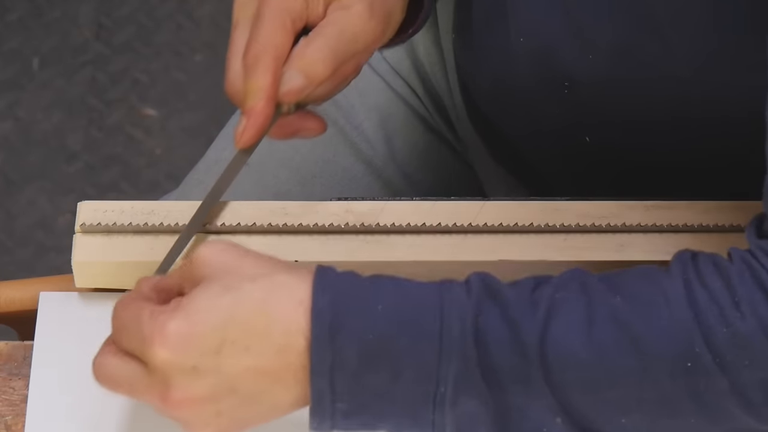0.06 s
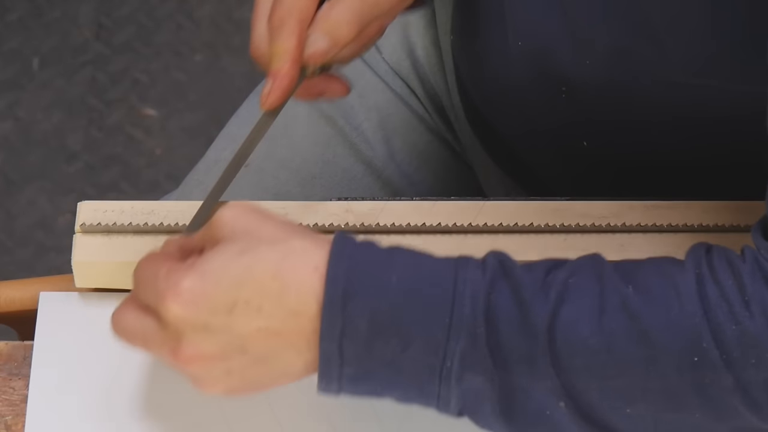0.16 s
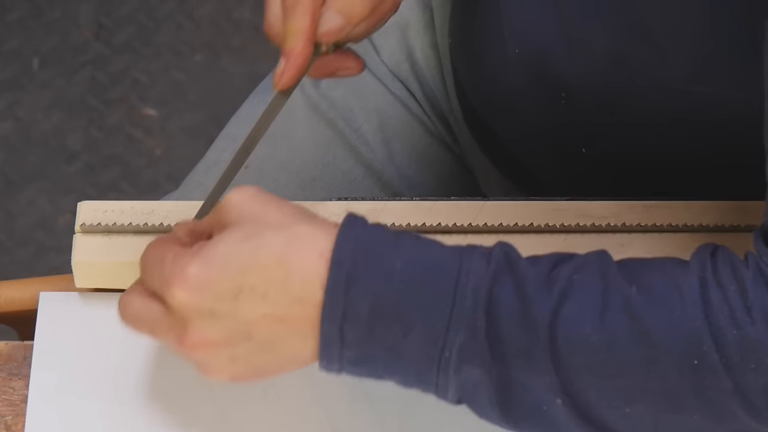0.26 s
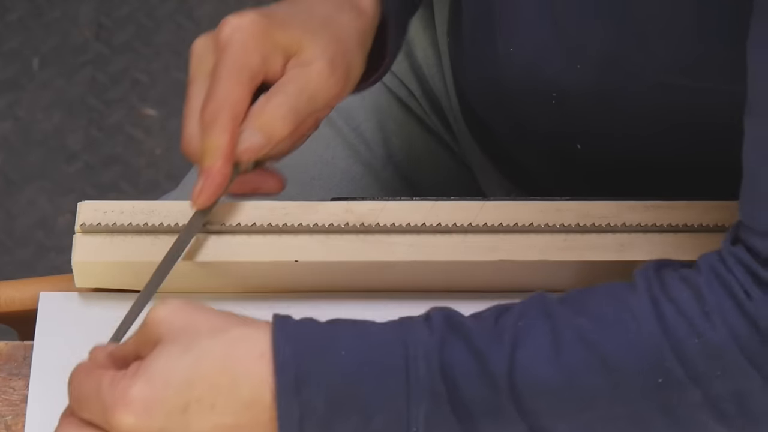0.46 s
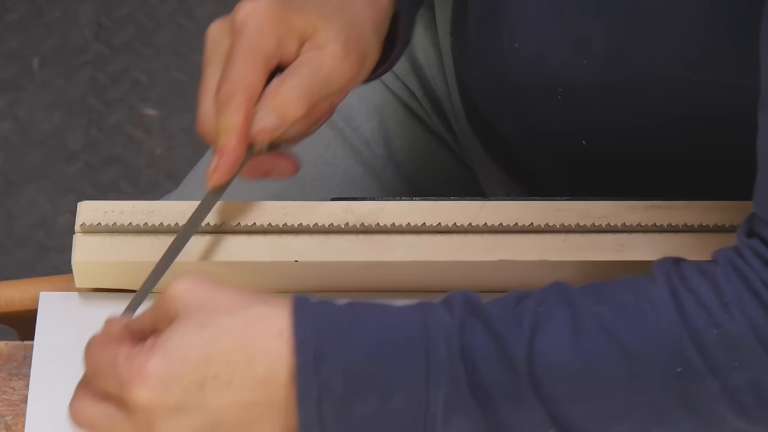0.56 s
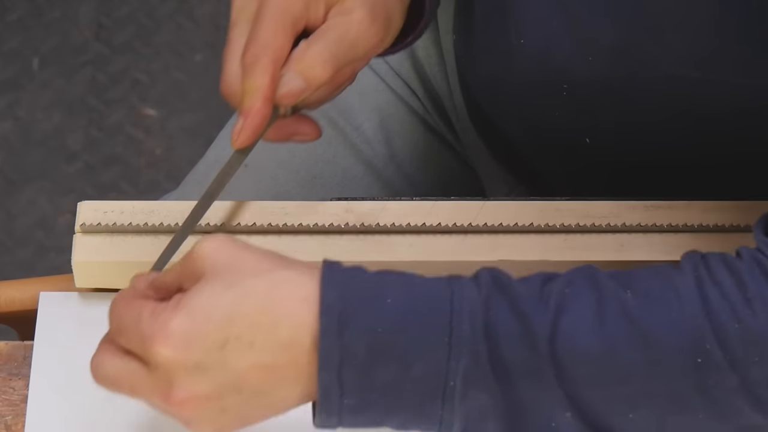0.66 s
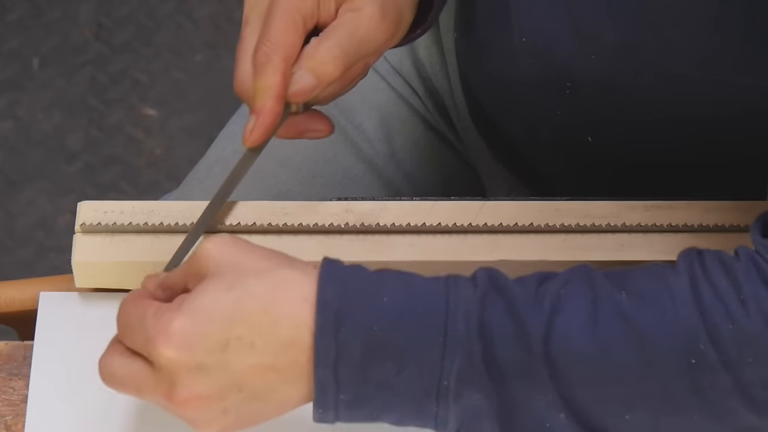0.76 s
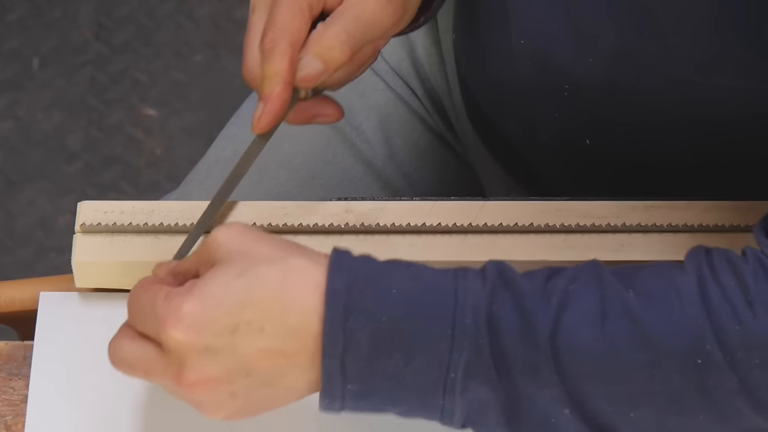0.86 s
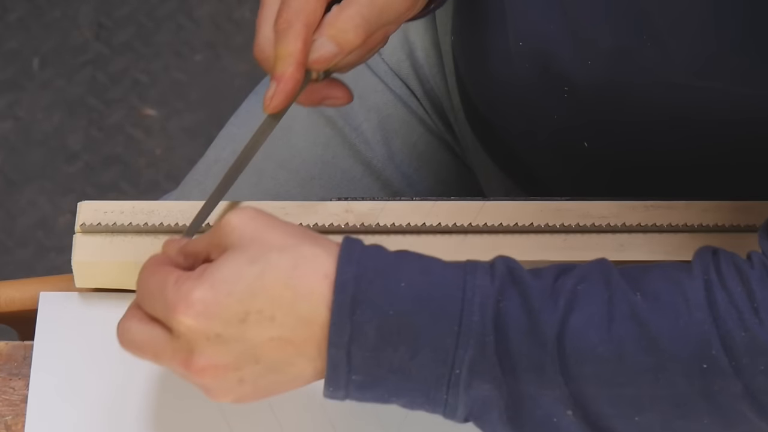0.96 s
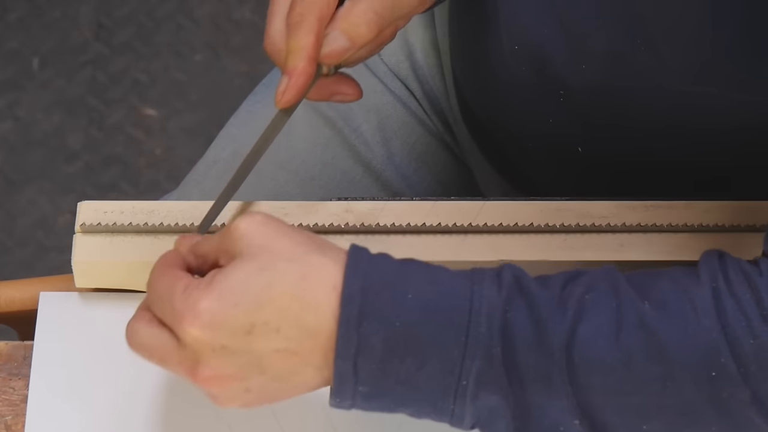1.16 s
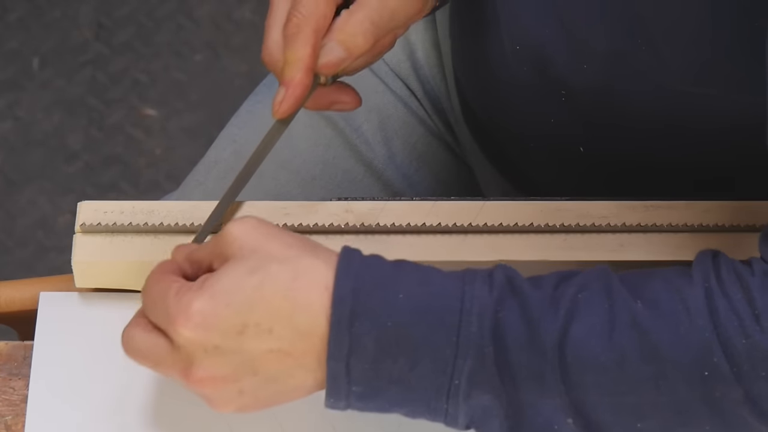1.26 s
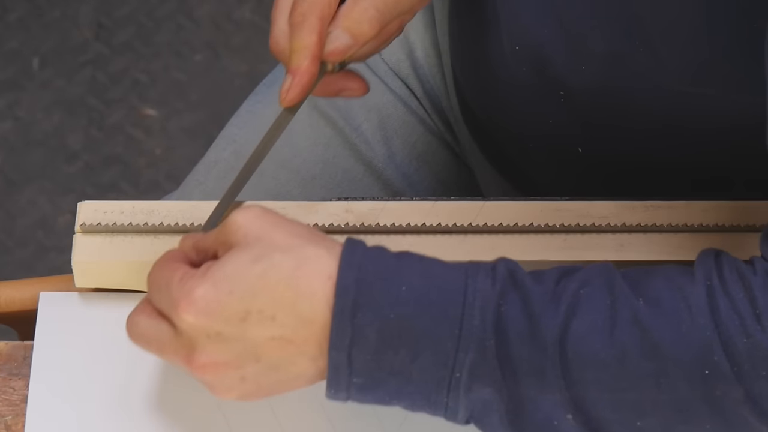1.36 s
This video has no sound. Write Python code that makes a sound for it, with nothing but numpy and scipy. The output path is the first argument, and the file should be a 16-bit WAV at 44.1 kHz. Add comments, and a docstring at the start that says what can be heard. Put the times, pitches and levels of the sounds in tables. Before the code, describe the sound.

Hand filing of a handsaw: light scratchy draw back, loud short rasping cut, then quieter draw

```python
"""Sharpening a saw by hand

A hand file sharpens a saw clamped in a wooden vice, close by in a small workshop.
It is drawn lightly back, pushed hard through the tooth with a short squeal, drawn back and set down once more.
Each ridge of the file pushes the tooth: slow ridges tick singly, fast ones blur into a rasp.
Blade and vice ring with these pushes, torn grit hisses on top, and noise and gliding tones make the rest.
"""
import sys
import numpy as np
from scipy import signal
from scipy.fft import rfft, irfft, next_fast_len
from scipy.io import wavfile
from scipy.ndimage import map_coordinates

SR = 44100
rng = np.random.default_rng(int(sys.argv[2]) if len(sys.argv) > 2 else 0)


def generate_wav(sig):
    """Save sig (samples, or channels by samples) to the path in sys.argv[1] as 16-bit PCM at SR."""
    pcm = np.round(np.clip(np.atleast_2d(sig).T, -1, 1) * 32767).astype(np.int16)
    wavfile.write(sys.argv[1], SR, pcm)


N = 61739  # length in samples


def amp(db):
    """Turn decibels into a gain."""
    return 10 ** (np.asarray(db) / 20)


def unit(x):
    """Scale a sound to an average (rms) strength of 1."""
    return x / np.sqrt(np.mean(x ** 2) + 1e-20)


def clock():
    """Give the time of each sample in seconds."""
    return np.arange(N) / SR


def along(points, hz):
    """Read a curve of (f/Hz, value) points, spaced by pitch as the ear hears it."""
    f, value = np.transpose(points)
    return np.interp(np.log(hz + 1), np.log(f + 1), value)


def wobble(rate):
    """Make a smooth random curve with this many random points a second."""
    return map_coordinates(rng.standard_normal(N // 8), [clock() * rate], mode="wrap")


def convolve(x, response):
    """Let every sample of x set off the given response."""
    return signal.fftconvolve(x, response)[:N]


def colour(points, size=8192):
    """Make a filter of energy 1 with the given spectrum, which never sounds before it is struck."""
    db = np.maximum(along(points, np.fft.rfftfreq(size, 1 / SR)), -100)
    # folding the cepstrum forward in time gives the minimum-phase filter
    cepstrum = irfft(np.log(amp(db)))
    cepstrum[1:size // 2] *= 2
    cepstrum[size // 2 + 1:] = 0
    h = irfft(np.exp(rfft(cepstrum)))
    return h / np.linalg.norm(h)


def dying_noise(shape, t60s):
    """Make a burst of noise of energy 1 in which each frequency dies at its own speed."""
    hz, t, z = signal.stft(rng.standard_normal(SR * 3 // 4), SR, nperseg=256)
    start_db = along(shape, hz)[:, None]
    t60 = along(t60s, hz)[:, None]
    tail = signal.istft(z * amp(start_db - 60 * t / t60), SR, nperseg=256)[1]
    return tail / np.linalg.norm(tail)


EDGE_DB_PER_S = 2483  # how fast contact is made and lost


def stroke_gain(strokes, axis):
    """Follow one level column through the strokes, falling away quickly outside each."""
    t, gain = clock(), np.zeros(N)
    for rows in strokes:
        s, db = np.transpose(rows)[[0, axis]]
        outside = abs(t - np.clip(t, s[0], s[-1]))
        gain += amp(np.interp(t, s, db) - EDGE_DB_PER_S * outside)
    return gain


# colour of the still air: f/Hz, relative level/dB
AIR_COLOUR = [(25, -19.5), (60, -7.5), (130, -6.5), (220, -3.5), (450, -8.5), (1000, -16.5), (4000, -25),
              (5400, -33), (8000, -25.5), (15000, -37.5)]
# colour of the wooden vice, also heard in the rasp: f/Hz, relative level/dB
VICE_COLOUR = [(20, -57), (60, -23), (190, -19.5), (222, -6), (290, -5), (370, 1), (500, 0.5), (620, 1),
               (760, -6), (1000, -18.5), (2500, -61.5)]
# colour of the lightly stroked blade, also heard in the rasp: f/Hz, relative level/dB
BLADE_LIGHT_COLOUR = [(300, -43.5), (700, -9), (900, -6.5), (1120, 5.5), (1400, -2.5), (2000, -5),
                      (2500, -13.5), (3200, -16.5), (4700, -23), (5500, -47)]
AIR_DB = -65
HUM_DB, HUM_HZ = -69, 150.5
LINGER_DB, LINGER_DB_PER_S = -52, 93.5  # start level and fall of the earlier stroke's echo


def background():
    """Coloured noise for still air, a sine for a faint hum, fading noise for an earlier stroke's echo."""
    t = clock()
    air = amp(AIR_DB) * unit(convolve(rng.standard_normal(N), colour(AIR_COLOUR)))
    saw_colour = colour(VICE_COLOUR) + colour(BLADE_LIGHT_COLOUR) / 2
    echo = unit(convolve(rng.standard_normal(N), saw_colour))
    linger = amp(LINGER_DB - LINGER_DB_PER_S * t) * echo
    hum = amp(HUM_DB) * unit(np.sin(2 * np.pi * HUM_HZ * t))
    return air + linger + hum


# single ridges catch on the tooth: t/s, click relative level/dB, knock relative level/dB
CATCHES = [(0.071, -34, -24), (0.0759, -31, -24), (0.0854, -30.5, -22), (0.0917, -28, -27.5),
           (0.106, -32, -38), (0.2704, -52, -39), (0.2804, -32, -38), (0.2881, -33, -31),
           (0.7978, -39.5, -29), (0.8026, -34, -27.5), (0.8142, -33, -32), (0.818, -25.5, -28.5),
           (0.8284, -27, -32), (0.8339, -28.5, -40.5), (0.8406, -21.5, -26), (1.294, -39, -29),
           (1.3361, -38, -27.5), (1.3475, -36, -29.5), (1.3619, -38, -27.5), (1.3719, -33, -28.5),
           (1.3795, -52, -37), (1.3851, -36, -29.5), (1.3954, -41, -29)]
# colour of the knock: f/Hz, relative level/dB
KNOCK_COLOUR = [(25, -33.5), (60, -18), (190, -13.5), (260, -5), (540, 3), (800, -6.5), (1250, 1.5),
                (1600, -7.5), (2100, -8), (2700, -14), (4500, -24), (5500, -40)]
# how the knock dies: f/Hz, time to fall 60 dB t60/s
KNOCK_DIES = [(150, 0.39), (450, 0.23), (800, 0.023), (1300, 0.18), (2200, 0.019), (5000, 0.023)]
# colour of grit torn off the tooth, for clicks and rasp: f/Hz, relative level/dB
GRIT_COLOUR = [(1500, -22), (2800, -1), (4400, -4.5), (5350, -9.5), (6500, -1.5), (7800, 1.5), (10300, 0),
               (12500, -9), (15500, -21)]
CLICK_DB, KNOCK_DB, CHIRP_DB = -8, 23.5, .5  # added to the levels of each catch
CLICK_T60, CHIRP_T60 = 0.013, 0.019  # seconds to fall 60 dB
CHIRP_HZ, CHIRP_END_HZ = 2320, 1089  # typical start and end; each catch varies a little
CHIRP_FALL_S, CHIRP_ATTACK_S = 0.0072, .0006


def catches():
    """A ridge snaps off the tooth: a bright click, a falling chirp in the blade and a knock in the vice."""
    t = np.arange(SR // 10) / SR
    clicks, knocks = np.zeros((2, N + SR))
    for s, click_db, knock_db in CATCHES:
        at = round(s * SR)
        glide = CHIRP_END_HZ + (CHIRP_HZ - CHIRP_END_HZ) * np.exp(-t / CHIRP_FALL_S)
        hz = glide * rng.normal(1, 0.034)
        envelope = amp(CHIRP_DB - 60 * t / CHIRP_T60) * (1 - np.exp(-t / CHIRP_ATTACK_S))
        chirp = envelope * np.sin(2 * np.pi * np.cumsum(hz) / SR)
        knock = amp(KNOCK_DB) * dying_noise(KNOCK_COLOUR, KNOCK_DIES)
        knock[:len(t)] += chirp
        knocks[at:at + len(knock)] += amp(knock_db) * knock
        click_gain = amp(click_db + CLICK_DB - 60 * t / CLICK_T60)
        clicks[at:at + len(t)] += click_gain * rng.standard_normal(len(t))
    return convolve(clicks, colour(GRIT_COLOUR)) + knocks[:N]


# speed of the file: t/s, ridges per second
SPEED = [(.07, 155), (.12, 360), (.18, 536), (0.246, 645), (.27, 580), (0.296, 470), (.32, 404), (.34, 600),
         (.355, 650), (.385, 1340), (.42, 1560), (.475, 2100), (.535, 1650), (.81, 170), (.85, 230),
         (.89, 399), (.91, 537), (0.951, 310), (.985, 549), (1.0, 507), (1.375, 170), (1.4, 260)]


def ridge_rate():
    """Count the ridges passing the tooth each second: a faster file passes more."""
    return np.interp(clock(), *np.transpose(SPEED))


JITTER = .13  # typical timing error, as a share of the time between ridges
SCATTER_DB = 2.5  # typical difference in strength between ridges
GRIT_DECAY = 1.5  # each puff of grit fades by exp(-1.5) before the next


def ridges():
    """Each ridge gives the tooth one uneven push, and a puff of grit that fades towards the next."""
    rate = ridge_rate()
    turns = np.cumsum(rate) / SR  # ridges passed so far
    count = np.arange(int(turns[-1]))
    chance = rng.standard_normal((len(count), 2))
    at = np.clip(np.searchsorted(turns, count + JITTER * chance[:, 0]), 0, N - 1)
    sizes = amp(SCATTER_DB * chance[:, 1])
    pushes = np.bincount(at, sizes, N) / np.sqrt(rate)
    steady = sizes.mean() * np.sqrt(rate) / SR  # the constant part of the push, removed below
    size_now = sizes[np.minimum(turns.astype(int), len(count) - 1)]
    gate = np.exp(-GRIT_DECAY * (turns % 1)) * size_now
    return unit(pushes - steady), unit(gate)


# ringing modes of blade and vice: f/Hz, relative level/dB, time to fall 60 dB t60/s
SAW_MODES = [(239.7, -12.5, 0.2), (245.2, -10.5, .12), (323, -7, 0.18), (375, -3.5, 0.053),
             (490.4, -1, .09), (584, -3, .09), (1089, 1, .13), (1164, 4, .08), (1297, -7, .05),
             (1566, 5, 0.22), (1940, -2.5, 0.087), (2250, -8, .05)]
RING_DB = -55  # ringing against the push itself, before each mode's own level


def saw_response(points):
    """A push on the tooth gives a broad answer and sets off the fading modes of blade and vice."""
    t = np.arange(SR // 3) / SR
    ring = np.zeros(len(t))
    for hz, db, t60 in SAW_MODES:
        ring += amp(RING_DB + db - 60 * t / t60) * np.cos(2 * np.pi * hz * t)
    ring[0] += 1  # the push itself
    h = signal.fftconvolve(ring, colour(points))
    return h / np.linalg.norm(h)


# light strokes, one list each: t/s, relative level/dB of the vice, of the blade, of the treble grit
DRAWS = [
    [(0.078, -34.5, -33.5, -42), (0.088, -26, -23.5, -51), (0.128, -28, -34, -49.5),
     (0.17, -29, -27.5, -46), (0.182, -25, -19, -45.5), (0.2, -29, -23, -40), (0.27, -22.5, -19.5, -37.5),
     (0.29, -25.5, -37, -58)],
    [(0.815, -38.5, -37, -43), (0.827, -30.5, -23.5, -52.5), (0.841, -42.5, -31.5, -45),
     (0.857, -37.5, -31, -50.5), (0.881, -26.5, -33.5, -47), (0.907, -27.5, -28, -55),
     (0.961, -33.5, -41, -58), (0.983, -29, -31.5, -44.5), (0.995, -23, -39, -64)],
    [(1.376, -42.5, -31, -59), (1.39, -24.5, -33, -57), (1.4, -48, -34.5, -35)],
]
# the cutting stroke: t/s, relative level/dB of the vice, of the blade, of the treble grit
CUT = [
    [(0.32, -26, -37, -47.5), (0.35, -17, -23.5, -34.5), (0.388, -21.5, -17.5, -18),
     (0.412, -15, -9.5, -9.5), (0.426, -20.5, -18, -34.5), (0.44, -19, -20.5, -23),
     (0.464, -22.5, -17, -10.5), (0.535, -23, -27, -38)],
]
# colour of the hard-pressed blade: f/Hz, relative level/dB
BLADE_HARD_COLOUR = [(300, -32.5), (700, -11.5), (900, -2), (1090, 5.5), (1400, -6), (1850, 1.5),
                     (2350, -9), (2900, -8), (3400, -24.5), (4700, -14.5), (5500, -40.5)]
# added to the stroke levels
DRAW_VICE_DB, DRAW_BLADE_DB, DRAW_GRIT_DB = -2, -2, -2.5
CUT_VICE_DB, CUT_BLADE_DB, CUT_GRIT_DB = 0.5, 2, -3.5
ROUGH = 0.29  # share of noise in the light strokes


def rasp():
    """The ridges drive vice and blade and tear off grit, lightly on the draws and hard on the cut."""
    noise = rng.standard_normal((2, N))
    pushes, gate = ridges()
    scrape = gate * noise[0]
    stroking = np.sqrt(1 - ROUGH) * pushes + np.sqrt(ROUGH) * scrape
    cutting = unit(pushes / 2 + scrape)

    vice = amp(DRAW_VICE_DB) * stroke_gain(DRAWS, axis=1) * stroking
    vice += amp(CUT_VICE_DB) * stroke_gain(CUT, axis=1) * cutting
    light = amp(DRAW_BLADE_DB) * stroke_gain(DRAWS, axis=2) * stroking
    hard = amp(CUT_BLADE_DB) * stroke_gain(CUT, axis=2) * cutting
    grit_gain = amp(DRAW_GRIT_DB) * stroke_gain(DRAWS, axis=3)
    grit_gain += amp(CUT_GRIT_DB) * stroke_gain(CUT, axis=3)
    grit = gate * noise[1] * grit_gain

    body = convolve(vice, saw_response(VICE_COLOUR))
    body += convolve(light, saw_response(BLADE_LIGHT_COLOUR))
    body += convolve(hard, saw_response(BLADE_HARD_COLOUR))
    return body + convolve(grit, colour(GRIT_COLOUR))


# squealing notes, around which pitch and level waver:
# start t/s, length t/s, first f/Hz, last f/Hz, level/dB
SQUEALS = [(0.368, 0.045, 5750, 5850, -29), (0.383, 0.036, 2930, 3044, -20), (0.4, 0.022, 1564, 1541, -8),
           (0.4, .018, 7650, 7620, -21), (.403, 0.017, 9770, 9650, -26), (.432, 0.017, 9840, 8620, -25),
           (0.441, 0.022, 1888, 1954, -24), (0.461, .022, 1046, 1036, -23), (0.463, 0.014, 4140, 4244, -25),
           (0.477, 0.02, 1973, 1870, -18.5), (0.482, 0.027, 3887, 3758, -26.5),
           (.502, .032, 1874, 1814, -32)]
SQUEAL_WAVER = .012  # unsteadiness as a share of the pitch
SQUEAL_EDGE_S, SQUEAL_FLUTTER_DB = 0.004, 2.5


def squeal():
    """On the cut the tooth sticks and slips, jumping from one short unsteady note to another."""
    t, out = clock(), np.zeros(N)
    for s, length, first_hz, last_hz, db in SQUEALS:
        glide = np.interp(t, [s, s + length], [first_hz, last_hz])
        hz = glide * (1 + SQUEAL_WAVER * wobble(900))
        to_edge = np.minimum(t - s, s + length - t)
        envelope = np.clip(to_edge / SQUEAL_EDGE_S + .5, 0, 1)
        gain = amp(db + SQUEAL_FLUTTER_DB * wobble(300))
        out += envelope * gain * unit(np.sin(2 * np.pi * np.cumsum(hz) / SR))
    return out


# shaking of the vice, one list for the cut and one for the draw after it: t/s, level/dB
SHUDDER = [
    [(.385, -34.5), (.415, -25.5), (.44, -19), (.48, -28.5), (.52, -34)],
    [(.822, -35.5), (.89, -42.5), (.96, -44.5)],
]
# colour of the shaking: f/Hz, relative level/dB
SHUDDER_COLOUR = [(25, -35.5), (55, -24.5), (195, -24), (218, 3), (255, -1), (290, -10), (420, -23.5),
                  (1000, -70)]


def shudder():
    """The vice shakes under the cut and, more faintly, the draw after it: low noise."""
    shaking = unit(convolve(rng.standard_normal(N), colour(SHUDDER_COLOUR)))
    return shaking * stroke_gain(SHUDDER, axis=1)


# how the room's tail dies: f/Hz, time to fall 60 dB t60/s
ROOM_DIES = [(150, 0.25), (400, 0.45), (1000, 0.5), (3000, .47), (4500, 0.41), (9000, 0.35), (14000, 0.32)]
# colour of the room's tail: f/Hz, relative level/dB
ROOM_COLOUR = [(100, -6), (230, -14.5), (340, 10.5), (520, 1), (750, -4), (1060, -4), (1400, -4),
               (2200, -4.5), (4200, 2.5), (5500, -2), (14000, -13.5)]
ROOM_DB, ROOM_DELAY_S = -15, .006


def workshop(x):
    """The room answers after a short delay with a dense tail, made from dying noise."""
    tail = dying_noise(ROOM_COLOUR, ROOM_DIES)
    return convolve(x, np.pad(tail, (round(ROOM_DELAY_S * SR), 0)))


def scene():
    """File and saw sound in the room, over its quiet background."""
    filing = catches() + squeal() + rasp() + shudder()
    return (filing + amp(ROOM_DB) * workshop(filing) + background())[None]


LOW_CUT_HZ, TOP_HZ = 33, 15700
CLIP_TOP = 1.03  # ceiling that the loudest peaks bend towards


def record(dry):
    """Thin the deepest bass, round off the loudest peaks and keep nothing above the top frequency."""
    thin = signal.sosfilt(signal.butter(3, LOW_CUT_HZ, "high", fs=SR, output="sos"), dry)
    clipped = thin / (1 + abs(thin / CLIP_TOP) ** 10) ** (1 / 10)
    size = next_fast_len(N + SR // 2)
    keep = np.fft.rfftfreq(size, 1 / SR) < TOP_HZ
    return irfft(rfft(clipped, size) * keep, size)[..., :N]


dry = scene()
out = record(dry)
generate_wav(out)
```